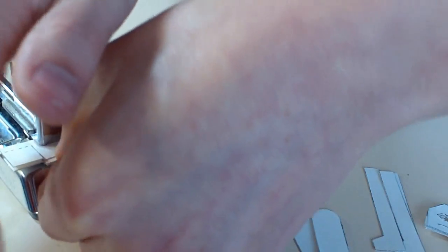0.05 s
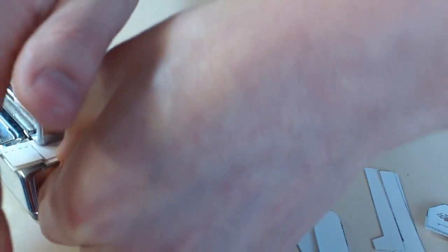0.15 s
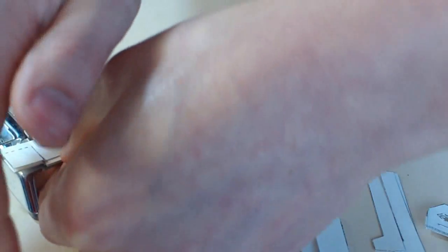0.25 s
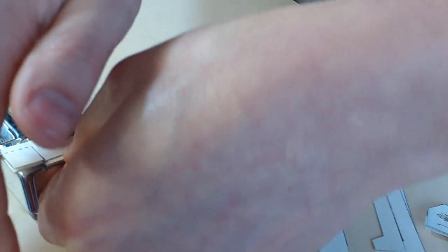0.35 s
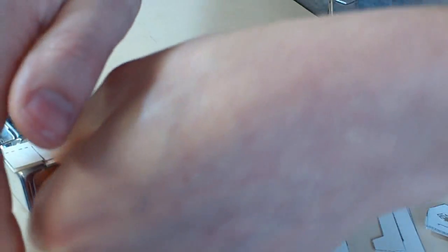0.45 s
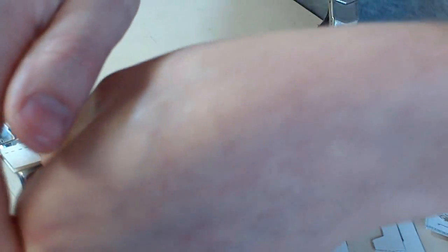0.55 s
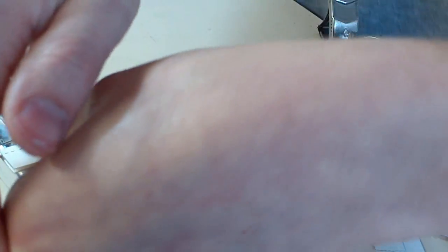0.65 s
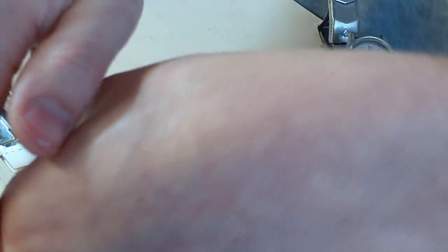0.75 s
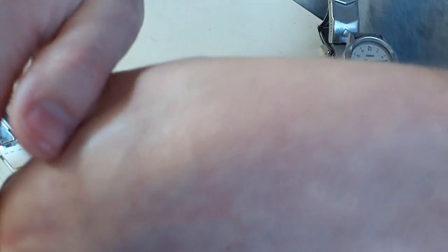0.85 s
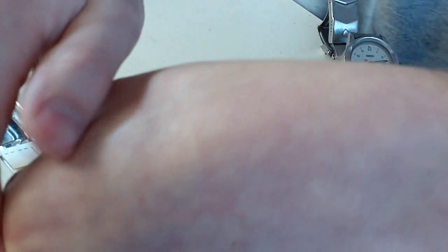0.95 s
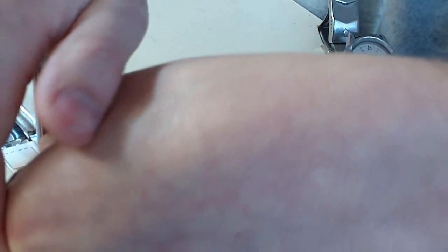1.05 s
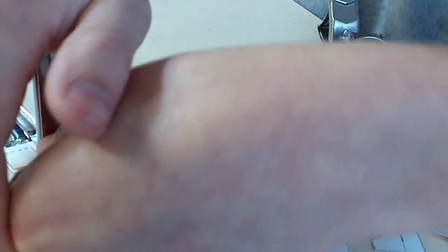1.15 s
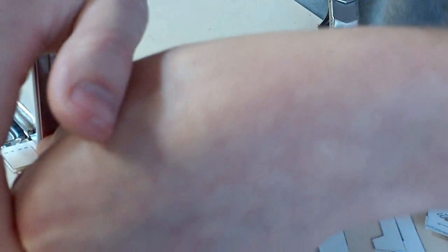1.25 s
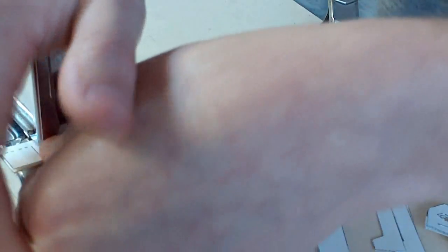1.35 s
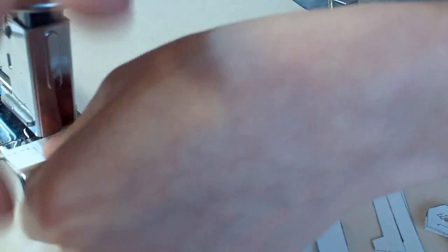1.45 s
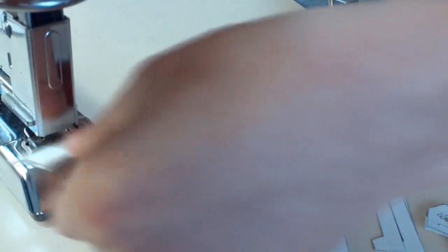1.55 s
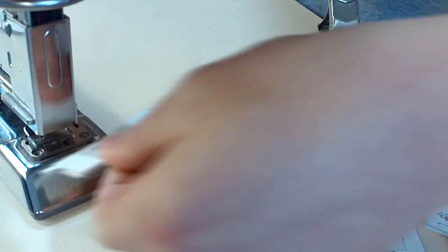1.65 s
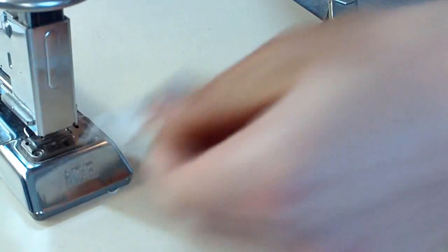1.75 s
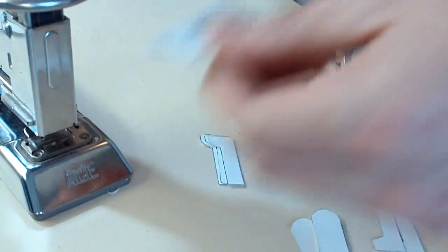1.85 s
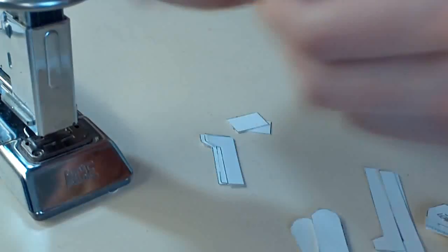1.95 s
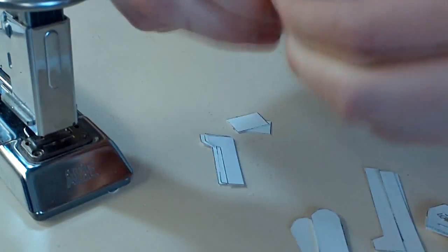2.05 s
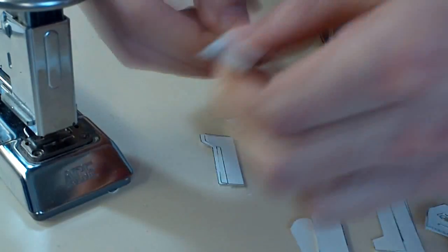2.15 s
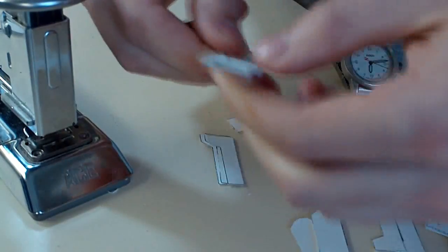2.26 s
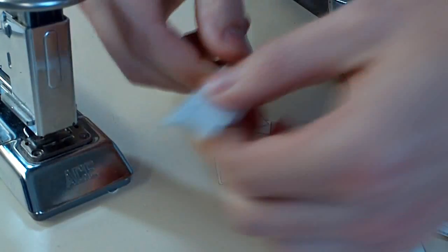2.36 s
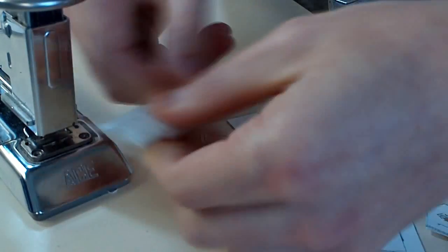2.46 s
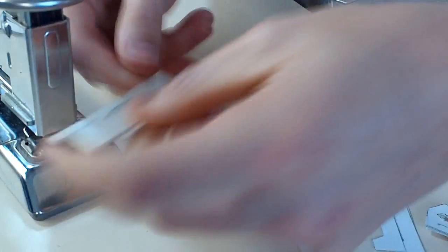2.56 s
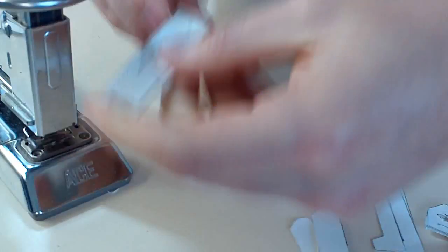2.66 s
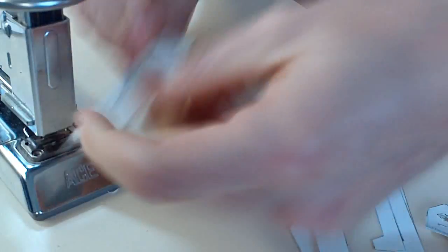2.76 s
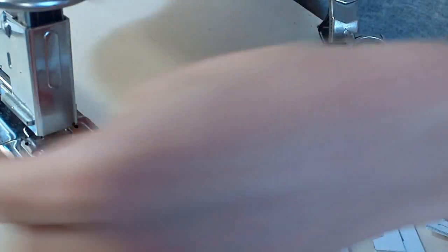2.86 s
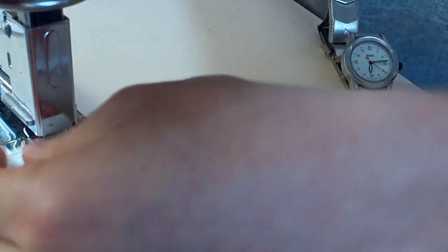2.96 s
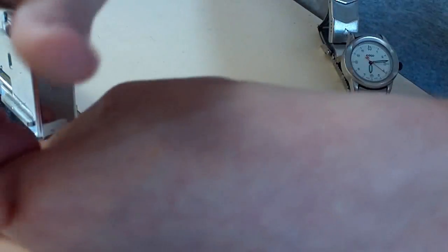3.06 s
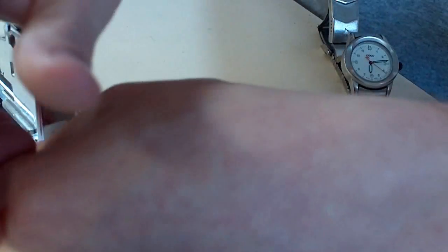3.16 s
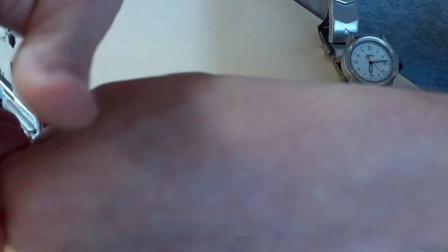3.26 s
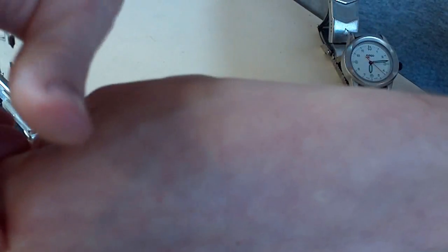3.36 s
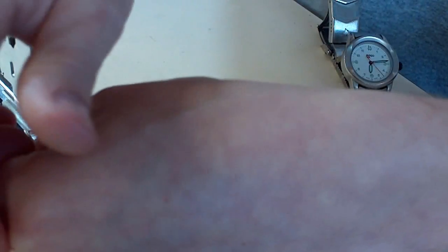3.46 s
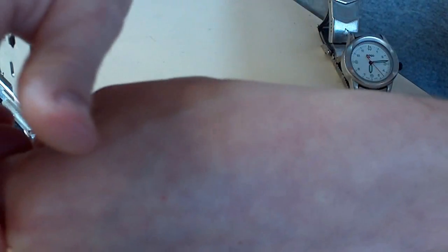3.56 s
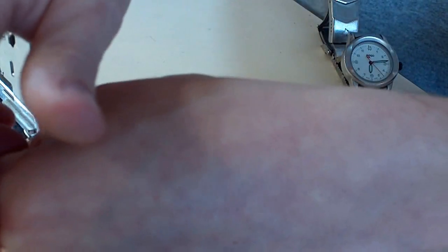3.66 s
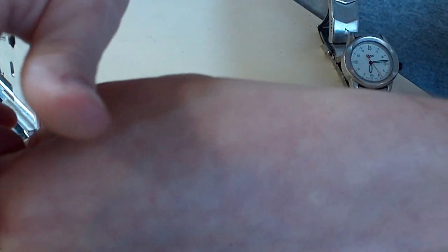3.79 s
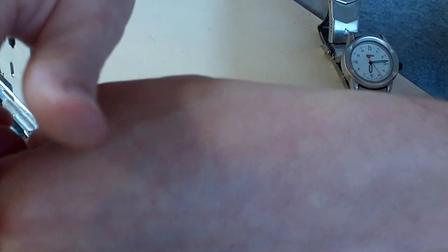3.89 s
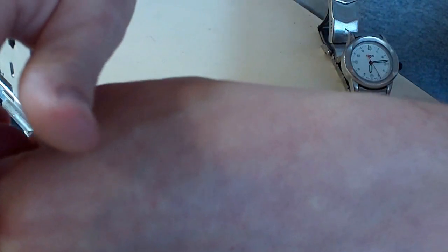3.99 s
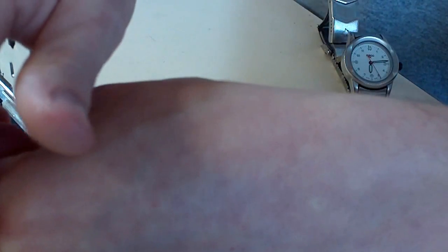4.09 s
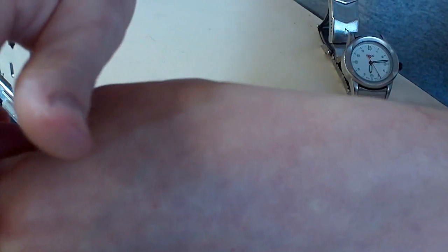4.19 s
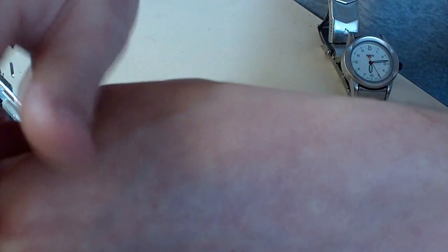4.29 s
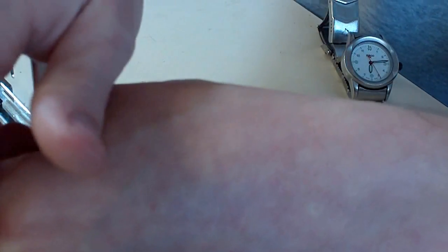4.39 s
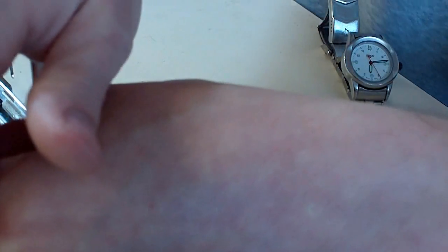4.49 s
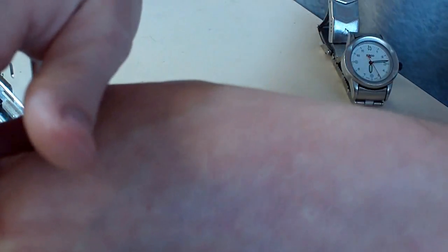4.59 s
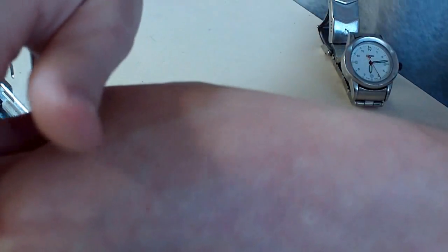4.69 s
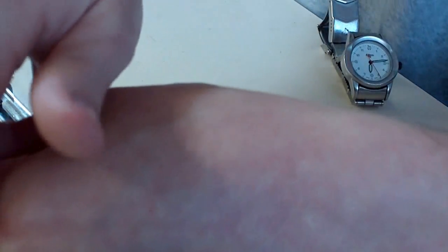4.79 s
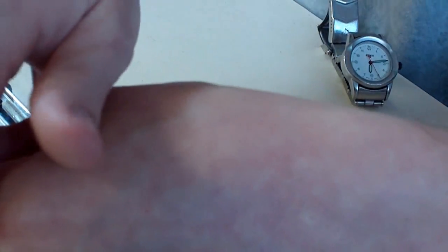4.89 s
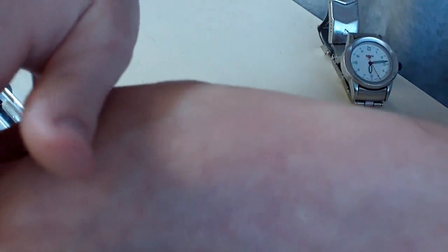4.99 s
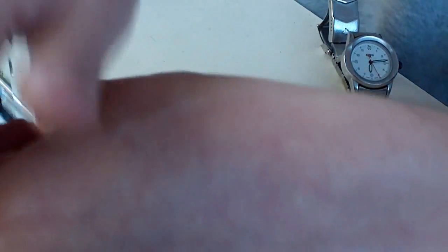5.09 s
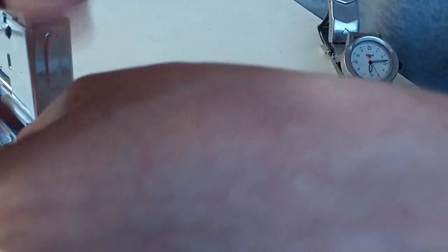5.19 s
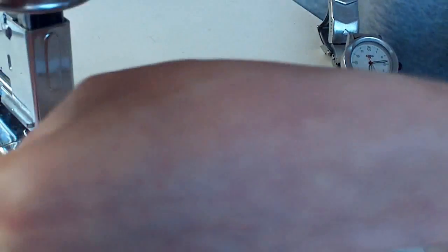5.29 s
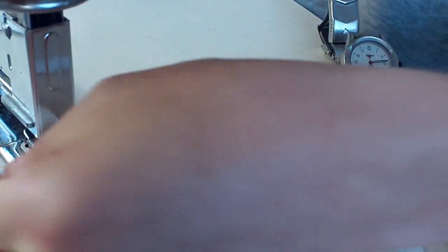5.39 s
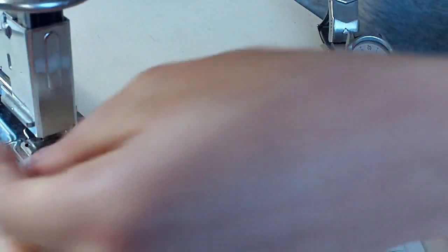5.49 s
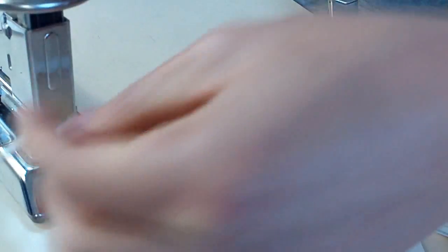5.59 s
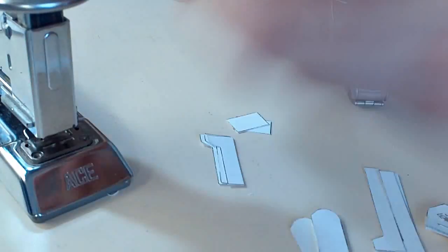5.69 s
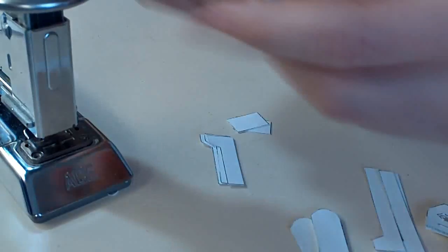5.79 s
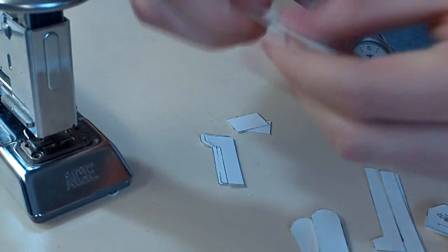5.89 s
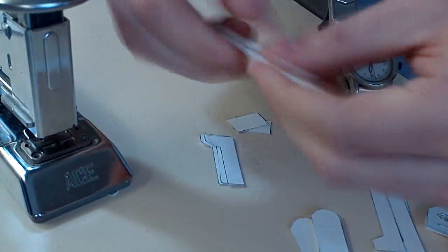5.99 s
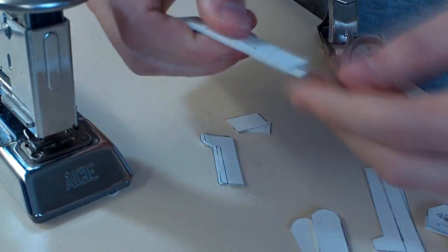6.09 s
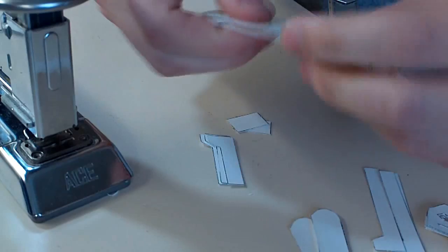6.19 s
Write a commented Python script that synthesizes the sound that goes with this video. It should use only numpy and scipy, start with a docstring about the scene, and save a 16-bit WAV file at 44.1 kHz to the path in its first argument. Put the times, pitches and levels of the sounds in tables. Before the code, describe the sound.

Two close, crunching staplings through layered card, each knocking the desk and springing back with a rattle, with faint card rustling between.

```python
"""Two hard, crunching clacks of a steel desk stapler biting through layered card in a quiet room.
Each time the staple snaps off its strip, the head bottoms out and thumps the desk, and the arm springs
back with a rattle. Steel contacts ring the frame; the desk top knocks, and desk and room boom low.
In between, fingers slide and turn the card over a steady hiss. The small, close microphone overloads
on the blows."""
import sys
import numpy as np
from scipy import signal
from scipy.fft import rfft, irfft, next_fast_len
from scipy.io import wavfile
from scipy.ndimage import uniform_filter1d

SR = 44100
rng = np.random.default_rng(int(sys.argv[2]) if len(sys.argv) > 2 else 0)


def int16_out(signal):
    """Quantize to a 16-bit WAV file."""
    q = np.round(np.clip(np.atleast_2d(signal).T, -1, 1) * 32767)
    wavfile.write(sys.argv[1], SR, q.astype(np.int16))


N = 275149
TIME = np.arange(N) / SR

# the arm springing back against its stop: start_s, clank_db, crack_db, scrape_db
ARM_RELEASES = [(1.397, 4.5, -3.5, -31.5), (5.0716, 7.5, -1.5, -27.5)]


def from_db(db):
    """Decibels to gain."""
    return 10 ** (np.asarray(db) / 20)


def rms_one(x):
    """Scale to unit rms."""
    return x / np.sqrt(np.mean(x ** 2) + 1e-20)


def at_hz(points, hz):
    """Read a curve on a log-frequency axis."""
    known_hz, values = np.transpose(points)
    return np.interp(np.log(np.maximum(hz, 1)), np.log(known_hz), values)


def butter(x, hz, kind, order=2):
    """Causal low-, high- or band-pass."""
    sections = signal.butter(order, np.clip(hz, 10, .45 * SR), kind, fs=SR, output="sos")
    return signal.sosfilt(sections, x + 1e-18)


def coloured(x, spectrum):
    """EQ a noise with a tone curve; rms 1."""
    size = next_fast_len(N)
    gain = from_db(at_hz(spectrum, np.arange(size // 2 + 1) * SR / size))
    return rms_one(irfft(rfft(x, size) * gain, size)[:N])


def grains(per_s, spread_db):
    """Random tiny clicks of uneven size; rms 1."""
    clicks = (rng.random(N) < per_s / SR) * rng.choice([-1, 1], N)
    return rms_one(clicks * from_db(spread_db * rng.standard_normal(N)))


def swell(middle_s, half_length_s, level_db):
    """Bell-shaped envelope of a slide that speeds up and slows down."""
    return from_db(level_db) * np.exp(-((TIME - middle_s) / half_length_s) ** 2)


def add(track, start_s, sound):
    """Mix a short sound into a track."""
    start = int(start_s * SR)
    track[start:start + len(sound)] += sound[:N - start]


def contact(grit_db, grit_s):
    """One click, followed by a brief crunch as the surfaces settle."""
    t = TIME[:SR // 20]
    crunch = rng.standard_normal(len(t)) * np.exp(-t / grit_s)
    return (t == 0) + from_db(grit_db) * crunch / np.linalg.norm(crunch)


def ring(force, modes, swell_s, detune):
    """Modes swell as a blow spreads, then die; the hand's changing load retunes them on each hit."""
    t, ringing = TIME[:SR // 2], 0
    for pitch_hz, level_db, t60_s in modes:
        loaded_hz = pitch_hz * (1 + detune * rng.standard_normal())
        ringing += from_db(level_db - 60 * t / t60_s) * np.cos(2 * np.pi * loaded_hz * t)
    return signal.fftconvolve(force, ringing * (1 - np.exp(-t / swell_s)))


def background(hiss_db=-38):
    """A steady bed of microphone hiss, room rumble and faint hum."""
    # tone curve of the rumble and hiss: frequency_hz, relative_db
    hiss_curve = [(13, -30), (22, -4), (48, -1), (88, -11.5), (114, -2), (153, -8), (209, -6), (357, -10),
                  (384, -10), (539, -9.5), (813, -10), (1350, -11.5), (1900, -16), (6230, -17), (7200, -23),
                  (9360, -85), (15800, -120)]
    # partials of the room's hum: pitch_hz, level_db
    hum_partials = [(120, -56.5), (360, -60), (542, -57), (1320, -57)]
    hum = sum(from_db(db) * np.sqrt(2) * np.sin(2 * np.pi * (hz * TIME + rng.random()))
              for hz, db in hum_partials)
    return from_db(hiss_db) * coloured(rng.standard_normal(N), hiss_curve) + hum


def card_rustle(resting_fingers_db=-51.5):
    """Fibres catch and slip by the thousand as the card moves under the fingers."""
    # tone curve of rustling card: frequency_hz, relative_db
    rustle_curve = [(150, 4.5), (400, -1.5), (900, 3), (1400, 2.5), (2000, 3.5), (2600, 2.5), (3600, -4),
                    (5500, -0.5), (7000, -7.5)]
    # strokes that place, press and turn the card: middle_s, half_length_s, level_db
    finger_strokes = [(0.065, 0.053, -42), (0.345, 0.048, -33), (1.65, 0.14, -41.5), (2.0, 0.16, -39.5),
                      (4.17, 0.024, -37), (4.56, 0.077, -40), (4.665, 0.039, -34.5), (5.3, 0.67, -44.5),
                      (5.8, 0.25, -42.5), (6.15, 0.18, -40.5)]
    fibres = butter(grains(per_s=5500, spread_db=5.0), [120, 7000], "band", order=4)
    movement = from_db(resting_fingers_db) + sum(swell(*stroke) for stroke in finger_strokes)
    return movement * coloured(fibres, rustle_curve)


def clack(bus, start_s, clank_db, crack_db, rise_s=0.00065, decay_s=0.003):
    """Steel meets steel: the frame clanks, and a fast envelope opens for the dry crack."""
    # modes of the hand-damped stapler frame: pitch_hz, level_db, t60_s
    frame_modes = [(936, -7, 0.015), (1372, -14, 0.053), (1760, -1.5, 0.022), (1845, -1, 0.016),
                   (2130, -8, 0.025)]
    clank = ring(contact(grit_db=-33, grit_s=0.013), frame_modes, swell_s=0.0023, detune=0.018)
    add(bus["clank"], start_s, from_db(clank_db) * clank)
    t = TIME[:SR // 20]
    envelope = (1 - np.exp(-t / rise_s)) * np.exp(-t / decay_s)
    add(bus["crack_envelope"], start_s, from_db(crack_db) * envelope)


def thump(bus, start_s, level_db, hardness_hz):
    """A blow, cushioned by the card, passes through the base and knocks on the desk."""
    # modes of the desk top with the stapler on it: pitch_hz, level_db, t60_s
    desk_modes = [(178.5, -18.5, 0.16), (255.6, -10.5, 0.065), (308.3, -15.5, 0.19), (399, -7, 0.052),
                  (432.6, -20.5, 0.12), (498, -7.5, 0.048), (568, -10.5, 0.034), (675, -13.5, 0.065),
                  (785, -4.5, 0.032), (914, -13, 0.061), (957, -12.5, 0.057), (1103, -10.5, 0.039),
                  (1379, -9, 0.041)]
    force = butter(contact(grit_db=-6, grit_s=0.022), hardness_hz, "low")
    knock = ring(force, desk_modes, swell_s=0.00087, detune=0.035)
    add(bus["knock"], start_s, from_db(level_db) * knock)


def shove(bus, start_s, level_db):
    """The weight of the hand drops, and desk and room give a low boom."""
    # low boom of desk and room after a heavy press: pitch_hz, level_db, t60_s
    boom_modes = [(75.9, -28, 0.28), (88.4, -15, 0.31), (117, -4.5, 0.07)]
    add(bus["boom"], start_s, ring(from_db([level_db]), boom_modes, swell_s=0.0019, detune=0.0046))


def staple_snap(bus, blade_after_s=0.0031, legs_after_s=0.00783):
    """The staple snaps off its strip, the freed blade shoots forward, and the legs hit the card."""
    # staples breaking free: start_s, level_db, desk_jolt_db
    snaps = [(0.2140, -0.5, -10), (4.2701, -1, 0)]
    for start_s, level_db, desk_jolt_db in snaps:
        clack(bus, start_s, clank_db=level_db + 5.5, crack_db=level_db - 5)
        thump(bus, start_s, desk_jolt_db, hardness_hz=594)
        clack(bus, start_s + blade_after_s, clank_db=level_db - 1.5, crack_db=level_db - 5)
        thump(bus, start_s + legs_after_s, level_db + 5.5, hardness_hz=353)
        shove(bus, start_s + legs_after_s, level_db - 1)


def head_landing(bus, pierce_lead_s=0.0036, weight_after_s=0.0035, crunch_after_s=0.0027):
    """The legs pierce the last layer of card, the head bottoms out, and the legs fold on the anvil."""
    # the head hitting bottom: start_s, level_db, fold_delay_s, fold_db
    landings = [(0.8250, 2.5, 0.014, -8), (4.7001, 1, 0.0195, 4)]
    for start_s, level_db, fold_delay_s, fold_db in landings:
        clack(bus, start_s - pierce_lead_s, clank_db=level_db - 7, crack_db=level_db - 26)
        clack(bus, start_s, clank_db=level_db + 5, crack_db=level_db - 7)
        thump(bus, start_s, level_db + 10, hardness_hz=1990)
        shove(bus, start_s + weight_after_s, level_db + 3)
        # the hand bears down once more, and the folding legs crush the card
        fold_s = start_s + fold_delay_s
        clack(bus, fold_s, clank_db=fold_db - 3.5, crack_db=fold_db - 8)
        thump(bus, fold_s, fold_db + 5, hardness_hz=1320)
        shove(bus, fold_s, fold_db + 1.5)
        crunch = swell(fold_s + crunch_after_s, half_length_s=0.036, level_db=fold_db - 26.5)
        bus["scrape_envelope"] += crunch


def blade_slips(bus, lead_s=0.068, every_s=0.0165, jitter_s=0.0012):
    """The rising blade sticks and slips: four faint, nearly even ticks ahead of each release."""
    for release_s, *_ in ARM_RELEASES:
        for tick in range(4):
            slip_s = release_s - lead_s + tick * every_s + jitter_s * rng.standard_normal()
            clack(bus, slip_s, clank_db=-22.5, crack_db=-26.5)
            thump(bus, slip_s, level_db=-19.5, hardness_hz=500)


def arm_release(bus, slide_after_s=0.048):
    """The arm springs back against its stop, and the magazine scrapes along its guides."""
    for start_s, clank_db, crack_db, scrape_db in ARM_RELEASES:
        clack(bus, start_s, clank_db, crack_db)
        thump(bus, start_s, level_db=-13.5, hardness_hz=910)
        bus["scrape_envelope"] += swell(start_s + slide_after_s, half_length_s=0.06, level_db=scrape_db)


def magazine_rattle(bus):
    """The loose magazine rattles after each release and taps the desk lightly."""
    # bounces of the magazine: start_s, clank_db, crack_db
    bounces = [(1.4297, -8, -24), (1.442, -15, -12.5), (1.451, -19, -22), (5.101, -3, -17.5),
               (5.140, 1, -16), (5.1722, -6, -30)]
    for start_s, clank_db, crack_db in bounces:
        clack(bus, start_s, clank_db, crack_db)
        thump(bus, start_s, level_db=-14, hardness_hz=910)


def steel_mix(bus):
    """Darkened frame clanks under dense, bright friction grains that voice the cracks and scrapes."""
    # tone curve of steel edges and dry card: frequency_hz, relative_db
    edge_curve = [(300, -9), (1000, -5.5), (2100, -3), (2600, -8), (3300, -11), (4200, -10), (5400, -4),
                  (6400, -8), (7500, -2)]
    grit = butter(grains(per_s=15000, spread_db=2.0), 5920, "low", order=4)
    envelope = np.hypot(bus["crack_envelope"], bus["scrape_envelope"])
    return butter(bus["clank"], 1900, "low", order=4) + envelope * coloured(grit, edge_curve)


def desk_mix(bus):
    """Desk knocks and the low boom, with the low mids of the knocks thrown back by the walls."""
    # dull echoes from the nearest walls: delay_s, level_db
    wall_echoes = [(.0126, -12.5), (.0204, -2.5), (.0313, -14)]
    low_mids = butter(bus["knock"], [240, 560], "band", order=1)
    echoes = np.zeros(N)
    for delay_s, level_db in wall_echoes:
        add(echoes, delay_s, from_db(level_db) * low_mids)
    return butter(bus["knock"], 86, "high") + butter(bus["boom"], 50, "high") + echoes


def room_reverb(x, build_s=0.00091):
    """Diffuse reverb: half-octave bands of noise that swell and die, each at its own rate."""
    # tone curve of the reverb: frequency_hz, level_db
    reverb_curve = [(60, 1), (150, -11.5), (280, -4), (450, -15.5), (1000, -7), (1800, -17.5), (3000, 1.5),
                    (5000, -4), (7000, -5)]
    # decay times of the room: frequency_hz, t60_s
    decay_times = [(100, 0.45), (500, .31), (1000, 0.33), (2000, 0.46), (6000, 0.36)]
    t, response = TIME[:SR * 3 // 4], 0
    edges_hz = np.geomspace(50, 9000, 16)
    for low, high in zip(edges_hz, edges_hz[1:]):
        centre_hz = np.sqrt(low * high)
        envelope = from_db(-60 * t / at_hz(decay_times, centre_hz)) * (1 - np.exp(-t / build_s))
        tail = butter(rng.standard_normal(len(t)), [low, high], "band") * envelope
        gain = from_db(at_hz(reverb_curve, centre_hz)) * np.sqrt(2 * (high - low) / SR)
        response += gain * tail / np.linalg.norm(tail)
    return signal.fftconvolve(x, response)[:N]


def scene(right_over_left_db=3.0):
    """Stapler, desk, card and room reach one microphone, whose right channel is a little louder."""
    bus = {name: np.zeros(N) for name in ("clank", "knock", "boom", "crack_envelope", "scrape_envelope")}
    staple_snap(bus)
    head_landing(bus)
    blade_slips(bus)
    arm_release(bus)
    magazine_rattle(bus)
    direct = steel_mix(bus) + desk_mix(bus) + card_rustle()
    pan = from_db([[-right_over_left_db / 2], [right_over_left_db / 2]])
    return (direct + room_reverb(direct) + background()) * pan


def gain_control(x, threshold_db=-9, slope=0.27, release_db_per_s=5, attack_hz=3):
    """A loud blow ducks the gain a little; it creeps back afterwards."""
    power = uniform_filter1d(np.mean(x ** 2, axis=0), size=1024)
    over_db = np.maximum(10 * np.log10(np.abs(power) + 1e-12) - threshold_db, 0)
    recovery_db = release_db_per_s * TIME
    cut_db = np.maximum.accumulate(slope * over_db + recovery_db) - recovery_db
    return x * from_db(-butter(cut_db, attack_hz, "low", order=1))


def record(dry, clip_level=1.05, mic_band_hz=7150, stopband_hz=16000):
    """The narrow-band microphone overloads on the blows; what overshoots its filter clips once more."""
    overloaded = np.clip(gain_control(dry), -clip_level, clip_level)
    mic_filter = signal.firwin(141, mic_band_hz, window=("kaiser", 9), fs=SR)[None]
    narrow = signal.fftconvolve(overloaded, mic_filter, mode="same", axes=1)
    top_cut = signal.cheby2(12, 70, stopband_hz, fs=SR, output="sos")
    return signal.sosfilt(top_cut, np.clip(narrow, -1, 1))


dry = scene()
out = record(dry)
int16_out(out)
```